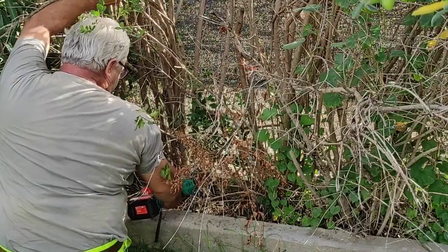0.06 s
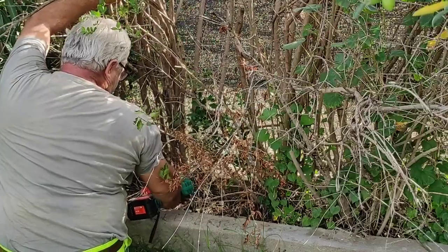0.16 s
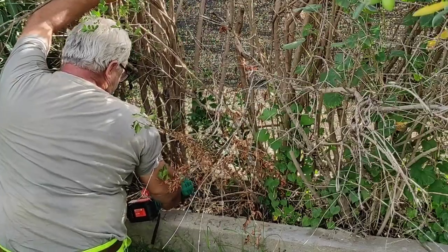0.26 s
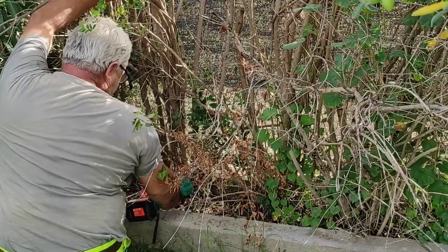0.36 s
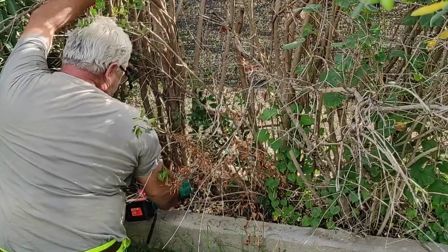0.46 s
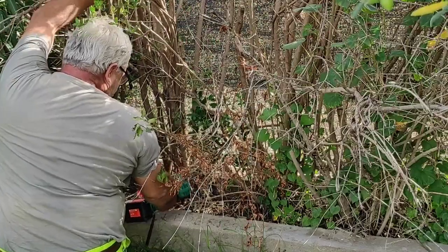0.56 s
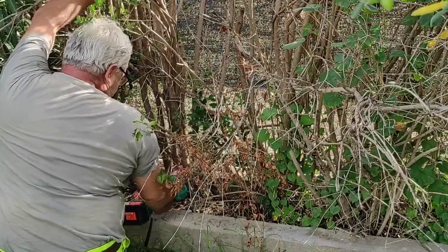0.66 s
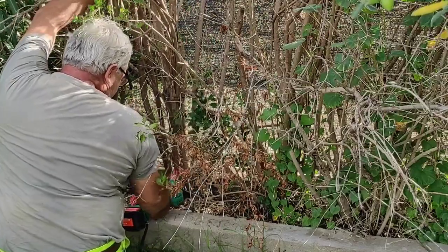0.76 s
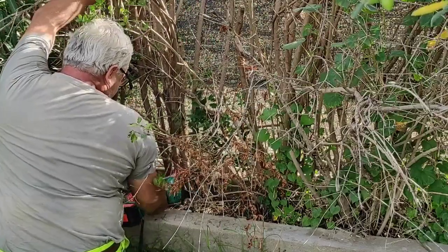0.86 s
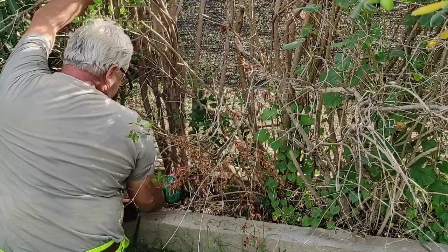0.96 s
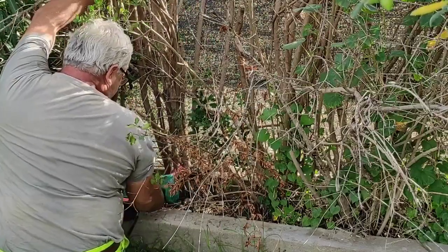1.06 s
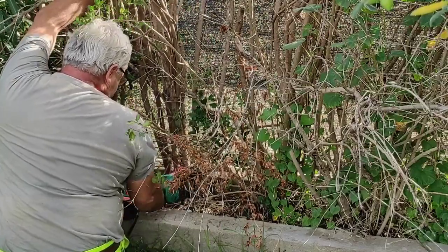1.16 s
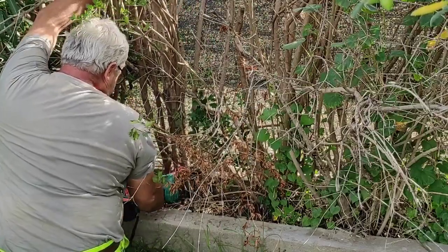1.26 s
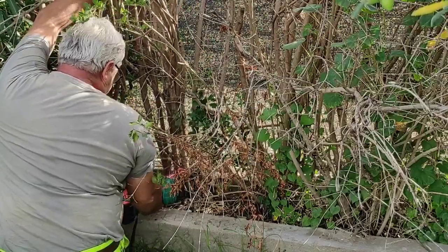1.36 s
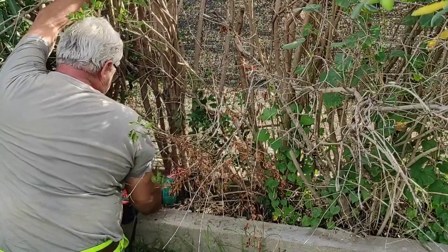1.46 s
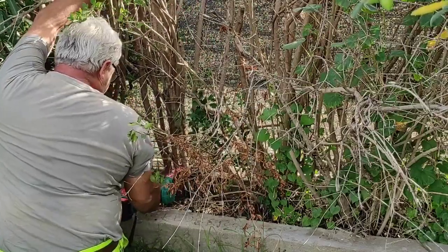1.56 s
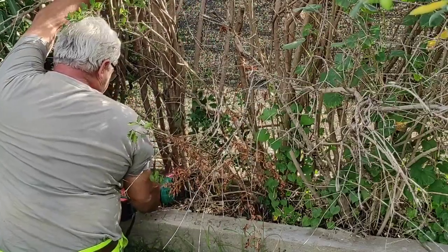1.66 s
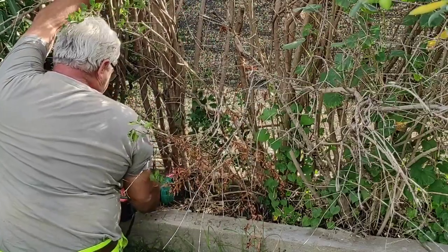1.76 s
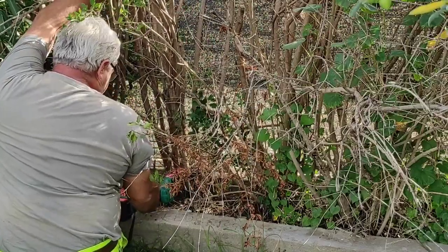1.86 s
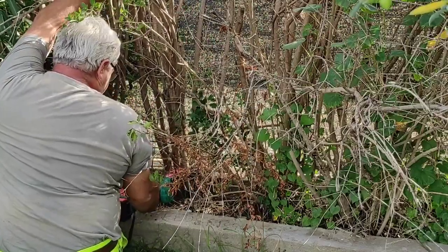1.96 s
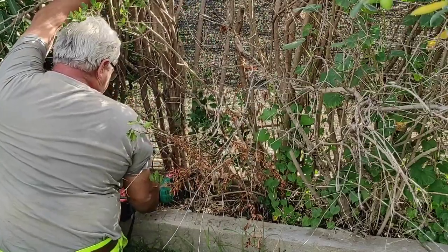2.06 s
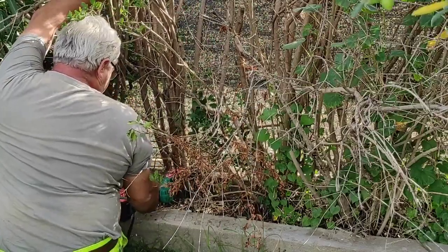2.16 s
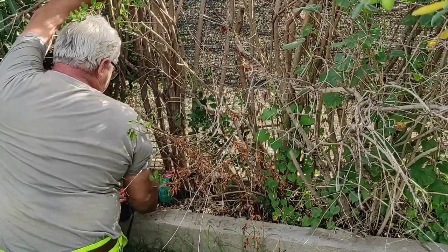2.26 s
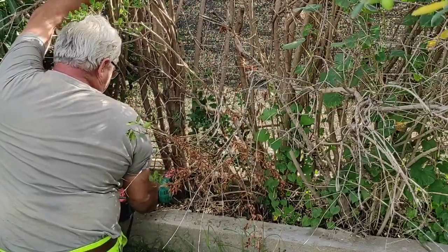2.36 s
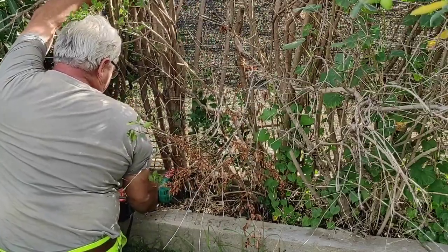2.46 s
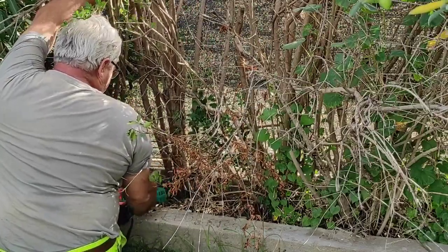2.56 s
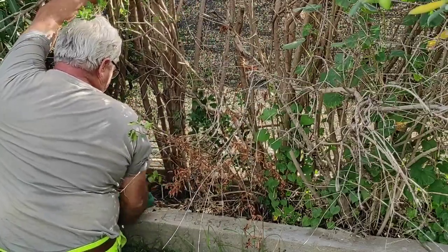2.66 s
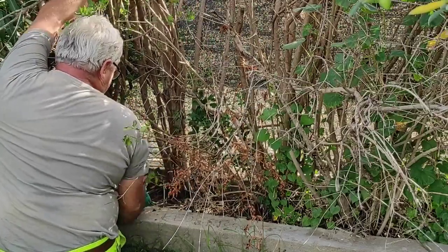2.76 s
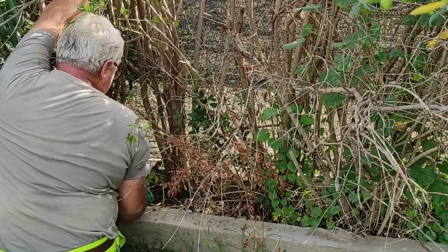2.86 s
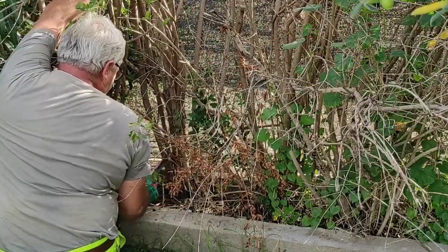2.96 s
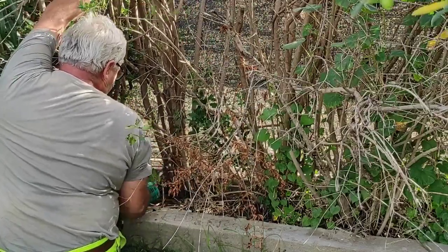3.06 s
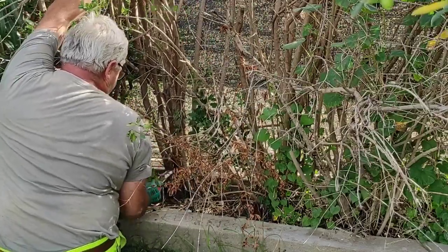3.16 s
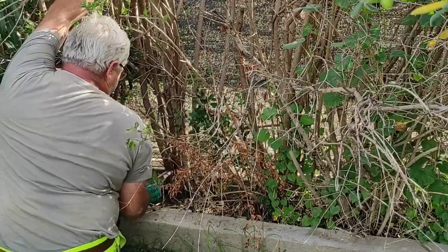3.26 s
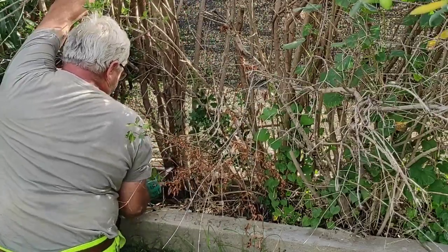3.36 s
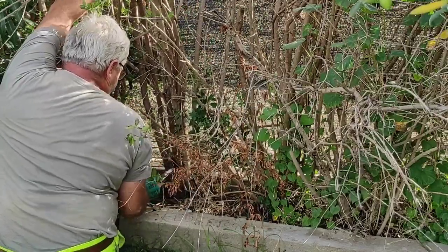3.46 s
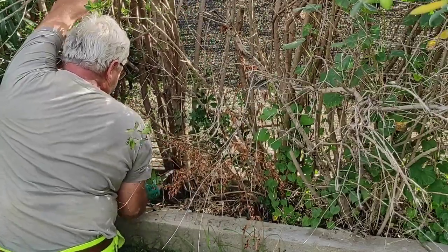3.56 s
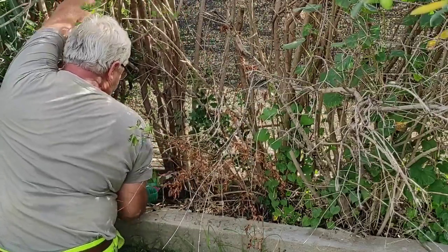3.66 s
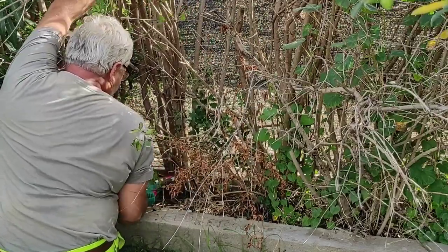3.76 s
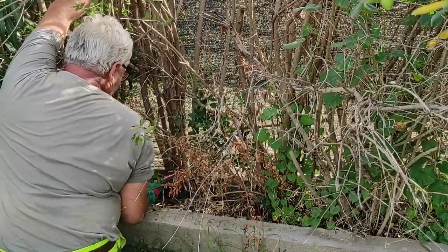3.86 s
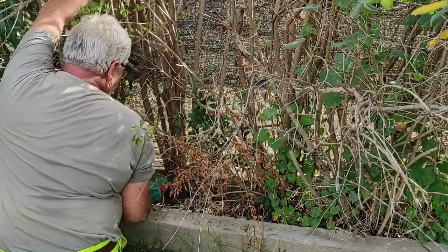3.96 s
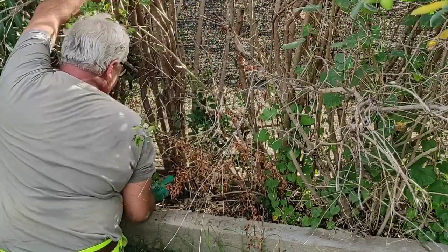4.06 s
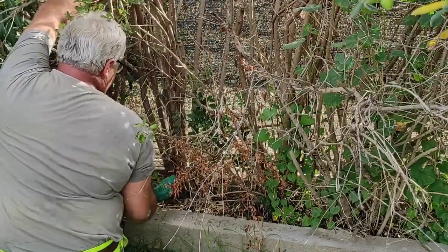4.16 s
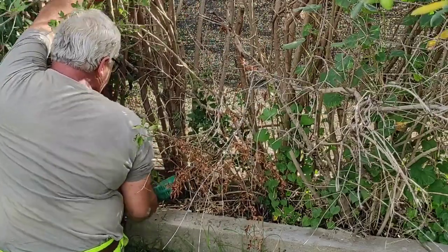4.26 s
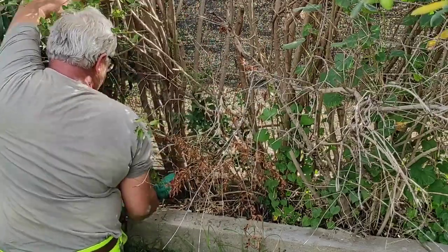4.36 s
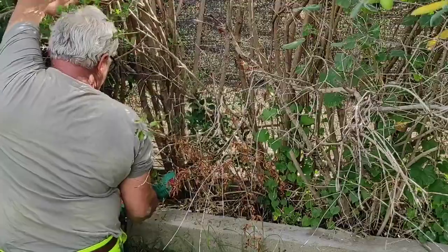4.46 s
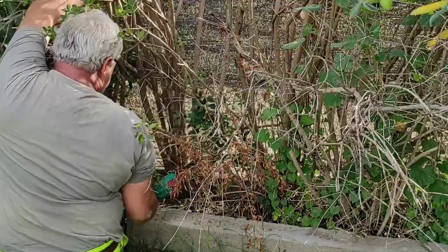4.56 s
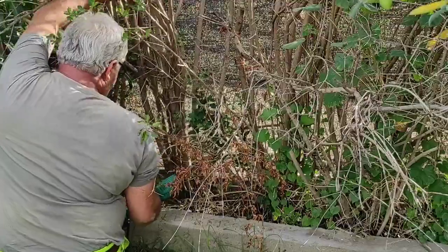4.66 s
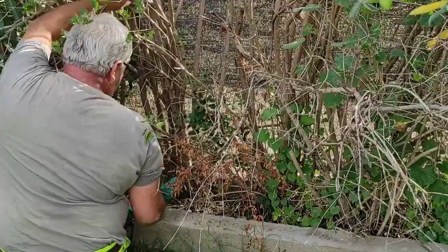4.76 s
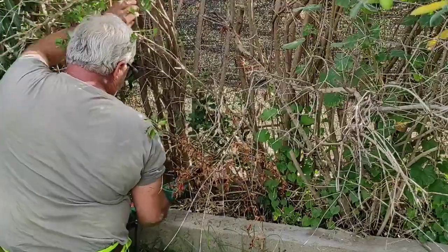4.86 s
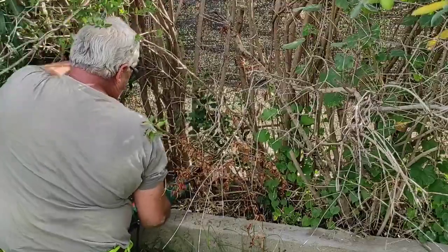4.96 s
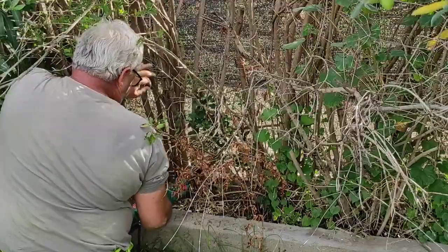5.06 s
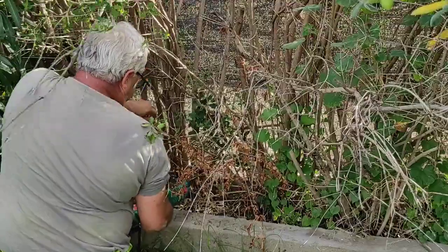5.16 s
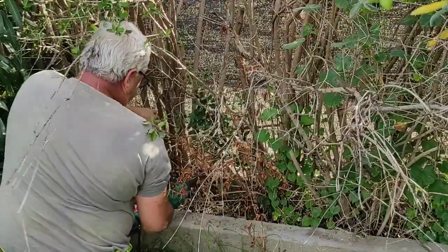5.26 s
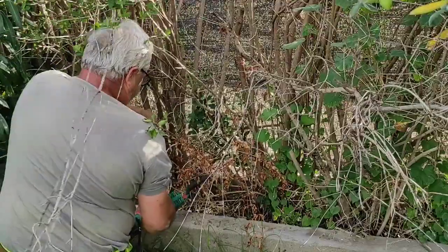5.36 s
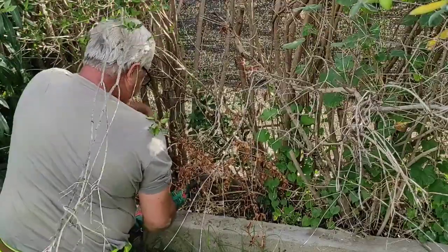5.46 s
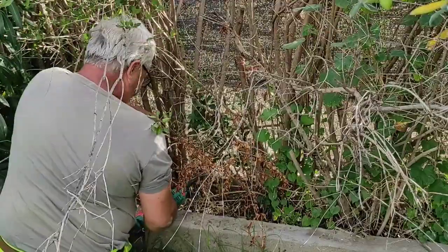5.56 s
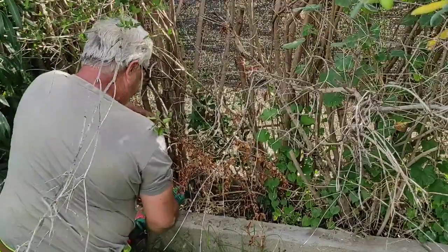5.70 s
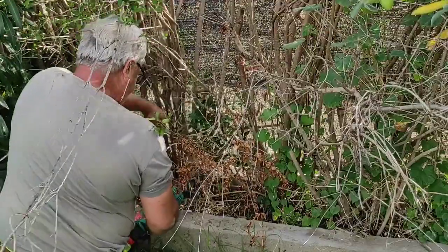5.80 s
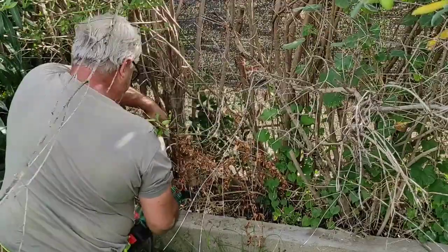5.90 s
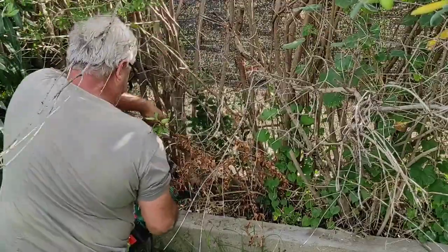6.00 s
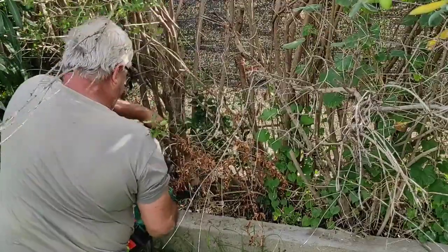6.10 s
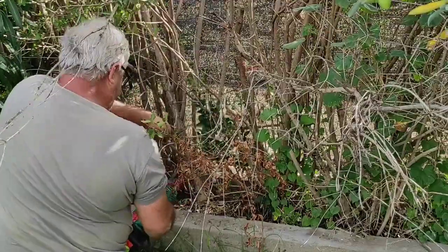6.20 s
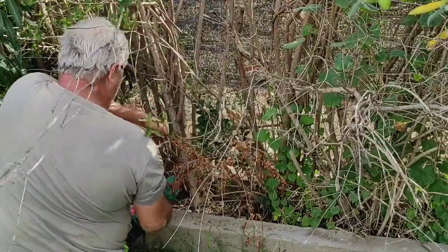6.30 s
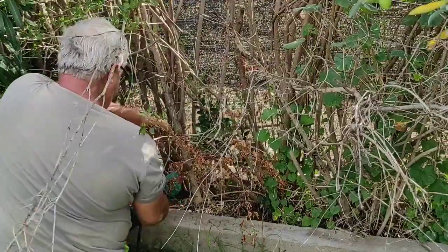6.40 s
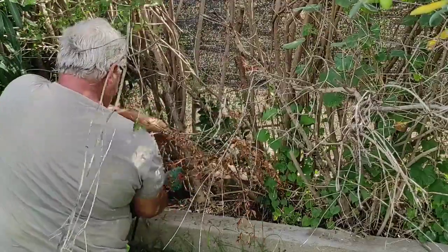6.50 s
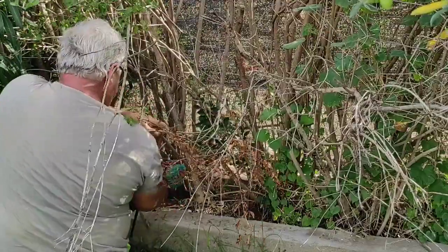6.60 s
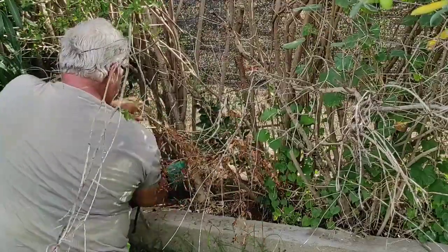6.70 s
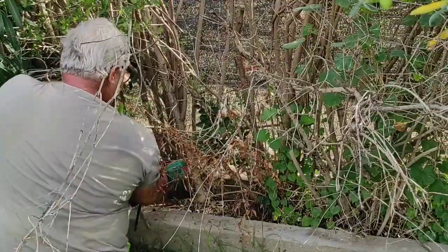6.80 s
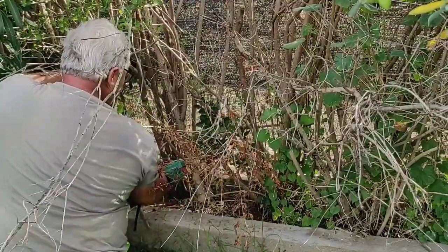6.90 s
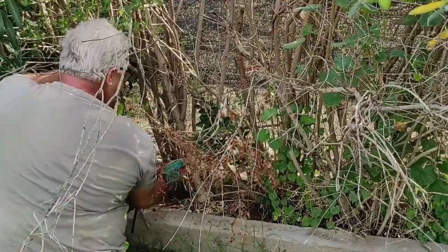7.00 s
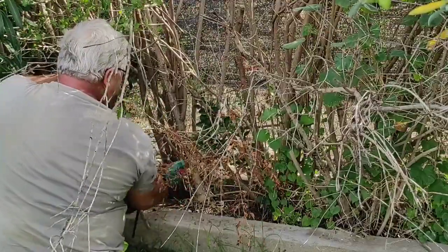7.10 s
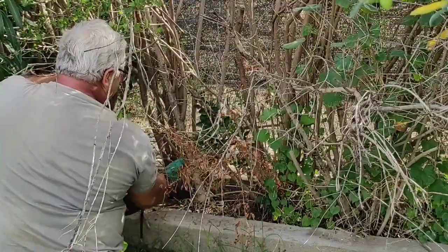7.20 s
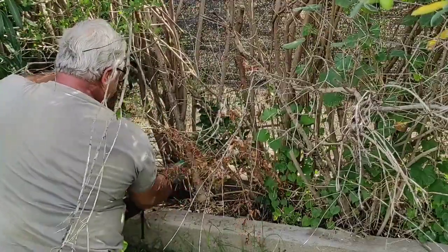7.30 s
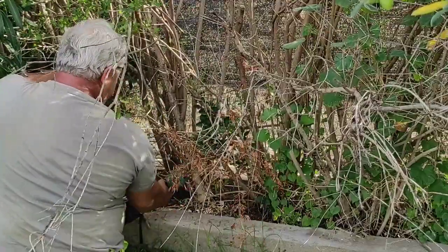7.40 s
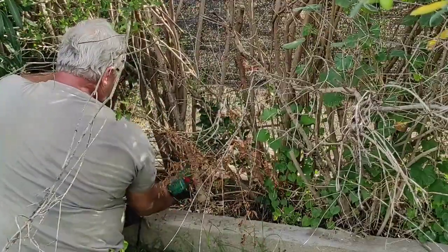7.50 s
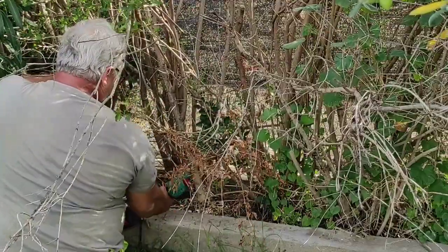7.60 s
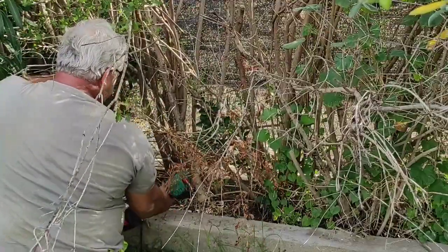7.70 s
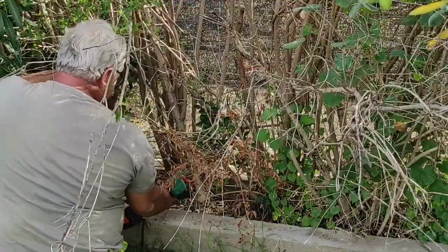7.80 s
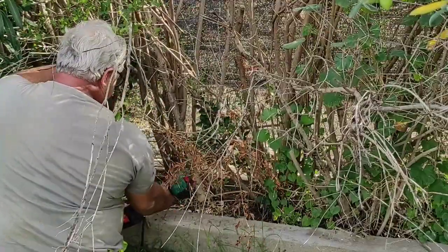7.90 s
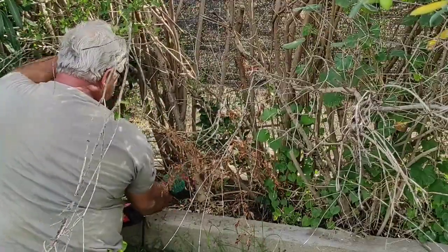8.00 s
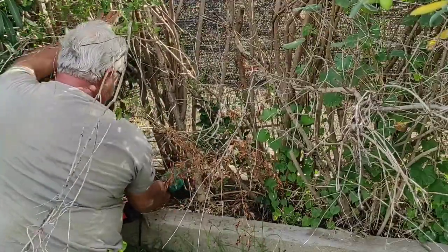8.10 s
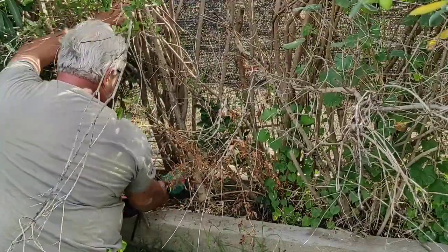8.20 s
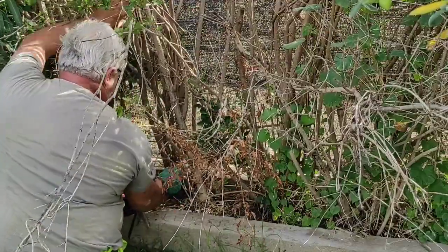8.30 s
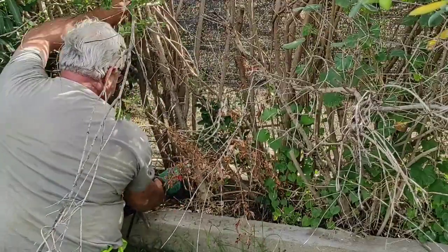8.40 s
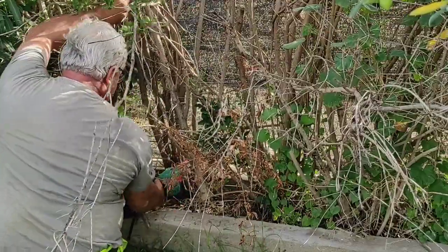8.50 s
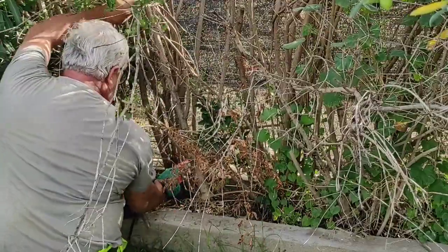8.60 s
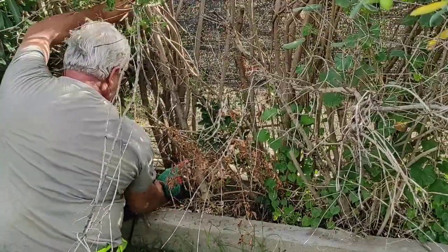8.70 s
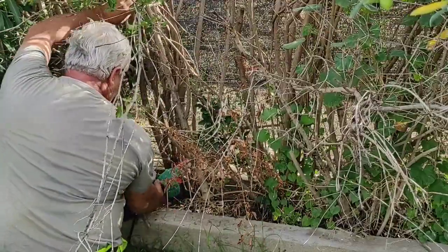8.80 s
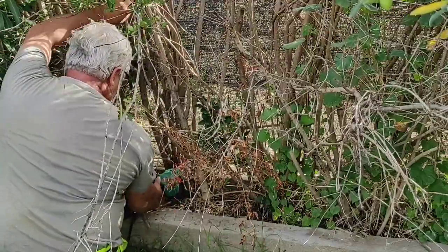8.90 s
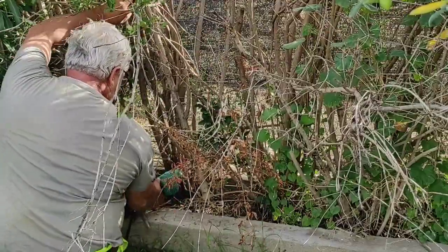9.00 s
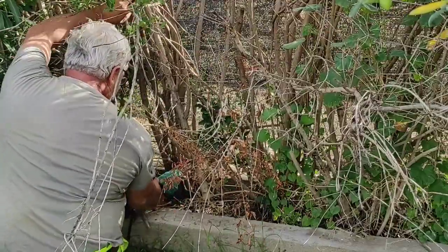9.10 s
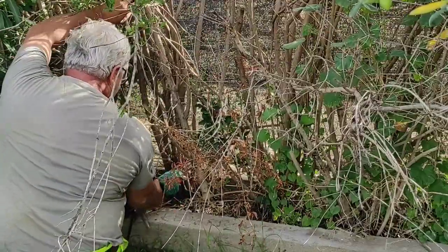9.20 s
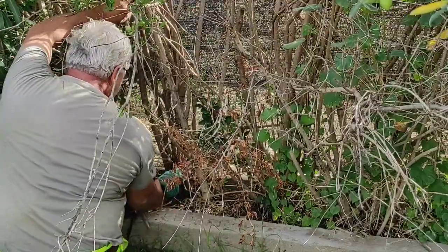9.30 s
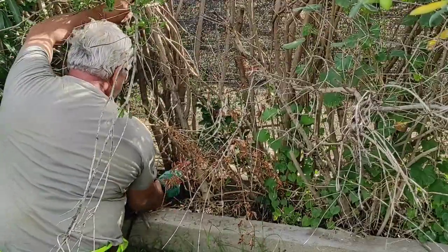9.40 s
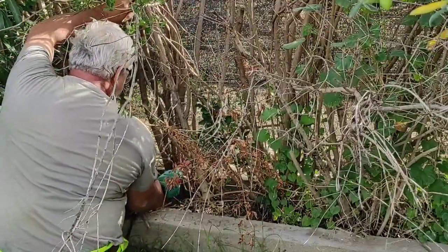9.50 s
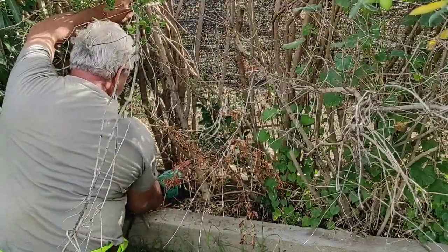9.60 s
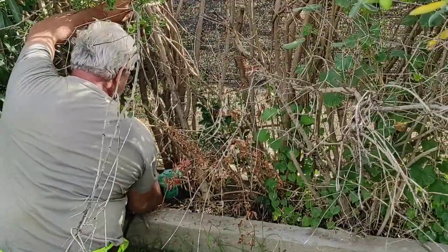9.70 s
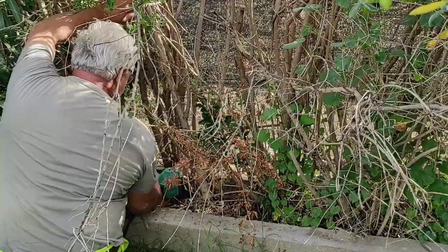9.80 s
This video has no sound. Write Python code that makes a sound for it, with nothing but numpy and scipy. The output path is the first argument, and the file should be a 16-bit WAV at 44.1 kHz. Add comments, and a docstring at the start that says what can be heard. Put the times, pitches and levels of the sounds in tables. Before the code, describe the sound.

In a garden, a small electric chainsaw whines and chews loudly through wood, rising in pitch as it breaks through, then winding down. For the remaining six seconds dry stalks rustle, scrape and crack as they are dragged, with a few soft puffs of breeze over a distant rumble. A click and a brief restart of the saw come last. Everything is close and on the left, with only a dull, faint copy on the right.

```python
"""At a garden fence, close to a phone, a small battery chainsaw chews through dry branches: the chain
rattles, the gears whine and the wood shudders over a distant outdoor rumble. The saw runs free, knocks
against a stem at 3.6 s and coasts to rest. The cut brush is pulled away, rustling, scraping and snapping,
while puffs of breeze reach the microphone. At the very end the trigger clicks and the saw starts again.
The left microphone is close to overload; the covered right one has a dull copy over its own faint noise."""
import sys
import numpy as np
from scipy import signal
from scipy.fft import rfft, irfft
from scipy.io import wavfile

SR = 44100
rng = np.random.default_rng(int(sys.argv[2]) if len(sys.argv) > 2 else 0)


def dump_mix(stems):
    """Bounce the given channels to the path in sys.argv[1] as a 16-bit WAV at rate SR."""
    frames = np.atleast_2d(stems).T  # one column per channel
    limited = np.clip(frames, -1, 1)  # hard clip at full scale
    pcm = np.round(limited * 32767).astype(np.int16)
    wavfile.write(sys.argv[1], SR, pcm)


N = 434369
TIME = np.arange(N) / SR

# Levels are relative, ahead of the gains of each layer and of the mix.
# the motor sags in the wood and races once the branch is through: time_s, shaft_hz
SHAFT_SPEED = [(0, 233), (.26, 230), (.42, 245), (.55, 231), (.76, 231), (.81, 213), (.89, 226),
               (1.02, 257), (1.17, 254), (1.33, 231), (1.53, 225), (1.7, 215), (2.2, 209), (2.57, 214),
               (2.64, 254), (2.77, 279), (2.9, 282), (3.6, 278)]
# the slower the shaft, the harder the chain works: shaft_hz, chain_db, bite_db (relative to the chain)
CHAIN_LOAD = [(214.8, -12, -8), (231.7, -11, -9), (240.1, -12.5, -9), (258.6, -12.5, -16),
              (273, -19.5, -28)]
# colour of the rattling chain: frequency_hz, level_db
CHAIN_COLOUR = [(150, -50), (450, -35), (800, -16.5), (1700, -12.5), (2100, -8), (2450, -7), (3100, -10),
                (3600, -11.5), (4050, -13), (4500, -9), (5400, -7.5), (6400, -2), (7500, -1.5), (8600, -6),
                (10000, -17), (15000, -19.5)]
# resonances of the bar and its housing: pitch_hz, width_hz, level_db
BAR_MODES = [(901, 140, -2.5), (1026, 180, -2.5), (1207, 190, -2), (1308, 137, 2)]
# colour of chips tearing out: frequency_hz, level_db
WOOD_COLOUR = [(40, -15.5), (130, -7.5), (230, -2), (330, -3), (520, -4), (680, 7.5), (1050, 11),
               (1300, 10), (1600, -5), (1820, -1), (2040, 7), (2500, -1.5), (3150, -3.5), (3700, 5),
               (4900, 4.5), (9000, -16)]
# tones of motor, gear and sprocket: shaft_multiple, free_db, cutting_db
WHINE_TONES = [(2.135, -54, -43), (2.455, -52, -48), (3.276, -39, -39), (4.27, -33.5, -38),
               (6.385, -45, -46), (9, -36, -27.5), (15.9, -34.5, -41), (17.93, -43, -43), (23.5, -34, -37),
               (27, -42, -36)]
# the saw is leant on and its gear sings out: start_s, length_s, added_db (relative to the plain whine)
GEAR_LEANS = [(-.02, 0.15, 2.5), (.23, .04, 0), (.46, .03, 0.5), (.56, 0.22, 3), (.8, 0.052, -2.5),
              (1.35, .17, -1.5), (1.67, 0.15, 3), (2.64, 0.093, 3.5)]
# the branch shudders under the cutters: start_s, length_s, level_db, buzz_share_db, pitch_hz
BRANCH_SHUDDERS = [(-.04, 0.29, -29, -2.5, 256), (.455, .04, -32.5, -2.5, 252), (.52, 0.17, -32, 2, 244),
                   (.715, 0.071, -31.5, -7.5, 372), (1.347, 0.089, -29, -12, 376),
                   (2.275, 0.29, -30.5, -12, 320), (2.421, .16, -34, -3.5, 225.8)]
# colour of the steady background: frequency_hz, level_db
BACKGROUND_COLOUR = [(20, -3), (30, -7), (55, -10), (110, -22), (165, -16.5), (240, -19.5), (400, -22),
                     (680, -28), (1100, -31), (2000, -38.5), (4500, -41.5), (7500, -40.5), (10000, -50),
                     (15000, -67)]
# faint steady noise of the blocked right microphone: frequency_hz, below_background_db
RIGHT_NOISE_FLOOR = [(60, 11.5), (110, 17), (200, 11), (380, 18), (700, 13), (1290, 14), (2380, 8.8),
                     (4400, 13.0), (8120, 18.5), (15000, 7.5)]
# the chain skips clear of the wood, most of all as the branch gives way: centre_s, length_s, dip_db
CHAIN_SKIPS = [(0.917, 0.075, -4), (1.035, 0.035, -4.5), (2.611, 0.031, -7.5), (2.665, 0.027, -8)]
# thick stems knock: start_s, level_db, pitch_hz, note_share_db
STEM_KNOCKS = [(2.544, -21.5, 1260, 11), (2.635, -26, 873, 12), (3.601, -35, 345, 0), (3.612, -41, 190, 2),
               (3.734, -45.5, 1293, 16), (4.197, -54, 1310, 10), (4.525, -57, 900, 4), (4.885, -59, 796, 6),
               (5.09, -55, 1930, 7), (5.863, -42, 177, 3.5), (5.932, -36, 985, 5), (5.966, -43, 890, -6),
               (6.26, -52, 1680, 8), (6.336, -49.5, 219, 4), (6.405, -54, 289, 14.5),
               (6.781, -50, 1080, -3), (6.852, -48.5, 950, -11), (7.085, -54.5, 1056, 1),
               (7.34, -55.5, 1030, 5), (7.61, -65.5, 225, 17), (8.189, -44.5, 997, 7.5),
               (8.231, -57, 157, 13), (8.63, -64, 171, 16), (9.385, -57, 750, -7), (9.399, -63, 1150, 10),
               (9.484, -68, 1200, 11), (9.524, -68, 1100, 10)]
# colour of a thick stem: frequency_hz, level_db
STEM_COLOUR = [(50, -16), (170, -1.5), (320, -0.5), (480, -7.5), (950, 4.5), (1500, -4), (3000, -6.5),
               (8000, -37)]
# the modes a knock, snap or click rings with: pitch_multiple, level_db
RING_PARTIALS = [(1, 0), (1.09, -6), (1.43, -8.5), (2.45, -16)]
# twigs snap; last, the trigger clicks twice: start_s, level_db, t60_s, pitch_hz, note_share_db
SNAPS_AND_CLICKS = [(3.4305, -5.5, 0.085, 2490, -14), (3.4504, -11.5, .1, 3330, -12),
                    (3.5357, -14, 0.079, 4440, -10), (3.5988, -2, 0.027, 2780, 0),
                    (3.6012, -12, 0.028, 1540, 6), (3.73, -18.5, 0.064, 2610, -1),
                    (3.801, -23.5, 0.049, 4670, -5), (3.8581, -28, 0.039, 4220, 7),
                    (3.915, -22.5, 0.06, 4820, -12), (4.03, -25, 0.071, 2600, -7),
                    (4.193, -33, 0.041, 4000, -12), (4.3702, -36, .045, 4540, -10),
                    (4.397, -36, .06, 4780, -8), (4.795, -26.5, .06, 4540, -8),
                    (4.8618, -31, .03, 4500, -10), (5.008, -33, .04, 4700, -10),
                    (5.0254, -34, .03, 4400, -10), (5.0855, -36, 0.08, 2770, -8),
                    (5.2285, -26.5, 0.028, 6200, 0), (5.2609, -39, 0.027, 4900, -10),
                    (5.2784, -38, .03, 4500, -7), (5.2969, -30, .04, 2350, -8),
                    (5.3053, -29, 0.1, 2800, -10), (5.449, -27.5, 0.063, 3700, -19),
                    (5.5524, -22.5, 0.054, 4630, -4), (5.5722, -24.5, 0.041, 3280, -7),
                    (5.8915, -0.5, 0.06, 1560, -18), (5.9583, -12, 0.047, 3920, -1.5),
                    (6.7768, -21, 0.043, 2050, -8), (6.8514, -20, 0.035, 2280, -9),
                    (6.8565, -24.5, 0.042, 3700, -7), (7.2033, -38, .06, 4500, -13),
                    (7.2693, -46, .06, 2810, -7), (7.3381, -25.5, .035, 6300, -2),
                    (7.352, -41, 0.036, 4100, -8), (7.655, -37, 0.036, 6500, 3),
                    (7.7213, -39, 0.073, 4870, -13), (7.745, -35, 0.038, 1900, -7),
                    (8.0835, -26.5, 0.064, 6850, -6), (8.188, -26, 0.06, 2540, -16),
                    (8.202, -31, .07, 4330, -12), (8.24, -34, .04, 2640, 4),
                    (8.2871, -22, 0.053, 2230, -13), (8.4842, -25.5, 0.048, 6750, 5),
                    (8.5556, -28, .04, 3200, -7), (8.5626, -27, 0.035, 6500, -7),
                    (8.6444, -38, .025, 3200, -4), (9.0442, -23.5, 0.022, 4700, 3),
                    (9.0793, -37, .05, 4160, -7), (9.1431, -42, 0.057, 4900, -7),
                    (9.24, -42, 0.043, 5030, -5), (9.383, -43, 0.068, 2380, 1), (9.558, -53, .05, 5000, -8),
                    (9.7435, -42, 0.018, 5500, -8), (9.7585, -31, .05, 2500, -6)]
TWIG_SNAPS, TRIGGER_CLICKS = SNAPS_AND_CLICKS[:-2], SNAPS_AND_CLICKS[-2:]
# colour of a sharp snap or click: frequency_hz, level_db
CRACK_COLOUR = [(300, -11), (900, -7), (2000, -6), (4000, -4.5), (6200, 4.5), (7600, 10.5), (9000, 1.5),
                (10500, -7.5), (15000, -12.5)]
# colour of its bright edge, in a twig the finest fibres: frequency_hz, level_db
EDGE_COLOUR = [(2000, -36), (7000, 12), (9500, 5), (13000, -23), (15500, -16)]
# thick stems crush as they bend: start_s, length_s, level_db
STEM_CRUNCHES = [(3.86, 0.1, -47), (5.828, .05, -47), (5.852, 0.023, -47), (8.18, 0.032, -56)]
# pulls and shoves drag the dry brush: start_s, length_s, level_db
BRUSH_PULLS = [(3.9, 0.28, -53), (4.385, 1.1, -48), (4.98, 0.26, -48.5), (5.825, .08, -42.5),
               (5.875, 0.081, -38.5), (6.03, 0.34, -53), (6.17, 0.22, -50), (6.24, 0.12, -44),
               (6.47, 0.093, -52.5), (6.72, 0.068, -49), (7.16, 0.045, -55), (7.32, 0.076, -61.5),
               (7.7, 0.038, -61), (8.06, 0.54, -53), (8.18, 0.13, -48.5), (8.75, 0.25, -60.5)]
# the bundle keeps stirring between pulls: start_s, length_s, level_db
BRUSH_STIRS = [(3.997, 2.954, -56.5), (7.049, 2.7, -66.5)]
# colour of dry leaves and stalks: frequency_hz, level_db
BRUSH_COLOUR = [(300, -17), (550, -6.5), (950, -5), (1500, -8), (2500, -6.5), (3600, -8), (5500, -4.5),
                (7500, 2.5), (9000, -2.5), (10500, -12), (15000, -17)]
# stems scrape over one another: start_s, length_s, level_db, pitch_hz
BARK_SCRAPES = [(4.62, .06, -53, 4200), (5.065, 0.047, -47, 2200), (5.29, .025, -55, 2500),
                (5.985, .015, -42, 2600), (6.205, .05, -52, 2600), (8.89, .03, -62, 1300)]
# puffs of breeze on the open port: start_s, length_s, level_db
BREEZE_PUFFS = [(6.24, 0.2, -47), (7.24, 0.32, -49.5), (8.16, 0.098, -50)]
# what the covered right port takes from close sound: frequency_hz, loss_db
COVER_LOSS = [(60, 13.5), (110, 13.5), (200, 16.5), (380, 20.5), (700, 24.5), (1290, 29), (2380, 31.5),
              (4400, 39.5), (8120, 51), (15000, 41.5)]

TRIGGER_OFF_S, COAST_S, COAST_DB, SLACK_BITE_DB = 3.612, 0.43, -35, -5
RESTART_S, SPIN_UP_S, RESTART_HZ, RESTART_DB = 9.765, 0.016, 240, -30.5
# the freed saw is drawn back behind the body, which shields the motor first, then the chain
WHINE_FADE_S, WHINE_FADE_DB_PER_S = 3.17, 24
CHAIN_FADE_S, CHAIN_FADE_DB_PER_S = 3.286, 25
BAR_DB, BAR_DB_PER_CHAIN_DB, BAR_SHUDDER_DB = -19, 0.62, 2
FULL_BITE_DB = -11.5  # from this bite on, the cutters are fully in the wood
FREE_WOBBLE, CUT_WOBBLE, SHUDDER_WOBBLE = 0.004, 0.014, 0.025  # shares of the pitch
HUM_DB, HUM_HZ, HUM_WIDTH_HZ = -52.5, 288, 88
SHUDDER_ATTACK_S, SHUDDER_RELEASE_S, SHUDDER_SAG_PER_S = 0.036, 0.056, 0.27


def undb(db):
    """Decibels to gain."""
    return np.exp(np.asarray(db) * (np.log(10) / 20))


def unit(x):
    """Scale to rms 1."""
    return x / np.sqrt(np.mean(x ** 2))


def walk(per_s):
    """Smooth random drift that changes per_s times a second, with a spread of 1."""
    fine = signal.resample_poly(rng.standard_normal(8000), 8, 1)
    return np.interp(TIME * per_s, np.arange(len(fine)) / 8, fine)


def response(points, size=2048):
    """Minimum-phase impulse response through (frequency_hz, level_db) points."""
    hz, db = np.transpose(points)
    bins_hz = np.maximum(np.arange(size + 1) * SR / (2 * size), 1)
    gain = undb(np.interp(np.log(bins_hz), np.log(hz), db))
    cepstrum = irfft(np.log(gain))
    cepstrum[1:size] *= 2
    cepstrum[size + 1:] = 0
    return irfft(np.exp(rfft(cepstrum)))[:size]


def colour(x, points):
    """Colour a white excitation, keeping its power."""
    taps = response(points)
    return signal.oaconvolve(x, taps / np.linalg.norm(taps))[:N]


def attenuate(x, loss):
    """Weaken a signal by a (frequency_hz, loss_db) curve."""
    return signal.oaconvolve(x, response([(hz, -db) for hz, db in loss]))[:N]


def resonate(x, hz, width_hz):
    """One resonance, gain 1 at its centre."""
    return signal.lfilter(*signal.iirpeak(hz, hz / width_hz, fs=SR), x)


def resonate_twice(x, hz, width_hz):
    """Two passes through a resonance: steeper skirts, about two thirds of the width."""
    return resonate(resonate(x, hz, width_hz), hz, width_hz)


def swells(rows, attack_s, release_s):
    """Gain of (start_s, length_s, level_db) gestures: each rises, holds and dies away."""
    power = np.zeros(N)
    for start_s, length_s, db in rows:
        rise = np.clip((TIME - start_s) / attack_s, 0, 1)
        fade = np.clip((TIME - start_s - length_s) / release_s, 0, 20)
        power += (undb(db) * rise * np.exp(-fade)) ** 2
    return np.sqrt(power)


def strikes(rate_hz, spread_db):
    """One impact per cycle of a moving rate, each of its own strength."""
    impacts = np.diff(np.floor(np.cumsum(rate_hz) / SR), prepend=0)
    return unit(impacts * undb(spread_db * rng.standard_normal(N)))


def crackle(per_s, spread_db):
    """Tiny clicks at random moments and of uneven size."""
    sizes = undb(spread_db * np.minimum(rng.exponential(size=N), 5))
    return unit((rng.random(N) < per_s / SR) * sizes * rng.choice([-1, 1], N))


def spray(x, t60_s, tail_db):
    """Every impact is followed by its own brief, fading hiss."""
    decay = np.exp(-2 * np.log(1000) / (t60_s * SR))
    power = signal.lfilter([1 - decay], [1, -decay], x ** 2)
    return unit(x + undb(tail_db) * np.sqrt(power) * rng.standard_normal(N))


def glance(x, echo_db, drift_s):
    """Early reflections off ground, low wall and stems, whose paths shift as the hands move."""
    out = x
    for lag_s in (0.0011, 0.0019, 0.0031, 0.0047, 0.0073):
        position = (TIME - lag_s - drift_s * walk(1.3)) * SR
        out = out + undb(echo_db) * np.interp(position, np.arange(N), x)
    return unit(out)


def scatter(x, t60_s, tail_db):
    """Direct sound plus a short diffuse tail from stems, wall and ground."""
    t = TIME[:SR // 4]
    tail = rng.standard_normal(len(t)) * np.exp(-np.log(1000) * t / t60_s)
    reflections = signal.oaconvolve(x, tail / np.linalg.norm(tail))[:N]
    wet = undb(tail_db)
    return (x + wet * reflections) / np.hypot(1, wet)


def drive():
    """Shaft rate, chain gain and depth of bite: under power, coasting to rest, then spinning up again."""
    powered_hz = np.interp(TIME, *np.transpose(SHAFT_SPEED))
    load_hz, *load_db = np.transpose(CHAIN_LOAD)
    chain_db, bite_db = (np.interp(powered_hz, load_hz, db) for db in load_db)
    chain_db -= CHAIN_FADE_DB_PER_S * np.maximum(TIME - CHAIN_FADE_S, 0)
    coasting = np.clip(1 - (TIME - TRIGGER_OFF_S) / COAST_S, 0, 1)
    starting = 1 - np.exp(-np.maximum(TIME - RESTART_S, 0) / SPIN_UP_S)
    first_run = TIME < TRIGGER_OFF_S
    shaft_hz = powered_hz * coasting + RESTART_HZ * starting
    slack_gain = undb(COAST_DB) * coasting + undb(RESTART_DB) * starting
    chain_gain = np.where(first_run, undb(chain_db), slack_gain)
    return shaft_hz, chain_gain, np.where(first_run, bite_db, SLACK_BITE_DB)


def chain_rattle(links):
    """Links strike and slide over sprocket and bar."""
    sliding = crackle(9000, spread_db=1.0)
    contacts = unit(spray(links, t60_s=0.014, tail_db=7.5) + 1.38 * sliding)
    rattle = colour(contacts, CHAIN_COLOUR) * undb(0.65 * walk(50))
    return undb(-0.5) * glance(rattle, echo_db=-13.5, drift_s=0.000303)


def bar_ring(blows, chain_gain):
    """Chain and shuddering branch ring the bar, which fades more slowly than the chain."""
    modes = sum(undb(db) * resonate_twice(spray(blows, t60_s=0.0059, tail_db=2.5), hz, 1.5 * width_hz)
                for hz, width_hz, db in BAR_MODES)
    low_cut = signal.butter(4, 720, "highpass", fs=SR, output="sos")  # a small bar radiates no bass
    shaking = swells([row[:3] for row in BRANCH_SHUDDERS], SHUDDER_ATTACK_S, SHUDDER_RELEASE_S)
    gain = np.hypot(undb(BAR_DB) * chain_gain ** BAR_DB_PER_CHAIN_DB, undb(BAR_SHUDDER_DB) * shaking)
    return gain * undb(1.1 * walk(7.2)) * unit(signal.sosfilt(low_cut, modes))


def wood_chips(shaft_hz, bite_db):
    """Cutters tear chips out of the branch, about one bite to two turns of the shaft."""
    bites = strikes(shaft_hz / 2 * undb(2 * walk(110)), spread_db=4)
    tearing = spray(0.27 * bites + crackle(2500, spread_db=5.0), t60_s=0.074, tail_db=1.5)
    return undb(bite_db + 2.5) * colour(tearing, WOOD_COLOUR)


def whine(shaft_hz, bite_db):
    """Motor and gear tones, clean running free and smeared in the wood, over the housing's rough hum."""
    cutting = np.clip(undb(bite_db - FULL_BITE_DB), 0, 1) ** 2
    wobble = (FREE_WOBBLE + CUT_WOBBLE * cutting) * walk(90)
    phase = 2 * np.pi * np.cumsum(shaft_hz * (1 + wobble)) / SR
    tones = np.zeros(N)
    for multiple, free_db, cutting_db in WHINE_TONES:
        level_db = free_db + (cutting_db - free_db) * cutting + 2.6 * walk(14)
        tones += undb(level_db) * np.sin(multiple * phase)
    flutter = undb(2 * walk(160))  # the chain tugs at the sprocket
    leaning = np.hypot(1, swells(GEAR_LEANS, attack_s=0.023, release_s=0.03))
    hum = undb(HUM_DB) * unit(resonate_twice(rng.standard_normal(N), HUM_HZ, HUM_WIDTH_HZ))
    shielding = undb(-WHINE_FADE_DB_PER_S * np.maximum(TIME - WHINE_FADE_S, 0))
    trigger = np.clip((TRIGGER_OFF_S - TIME) / 0.018, 0, 1)
    return (tones * flutter * leaning + hum) * shielding * trigger


def branch_shudder(blows):
    """The branch buzzes on the bar, sinking in pitch as the kerf deepens; blows rattle its resonance."""
    out = np.zeros(N)
    for start_s, length_s, db, buzz_db, hz in BRANCH_SHUDDERS:
        sag = np.exp(-SHUDDER_SAG_PER_S * np.clip(TIME - start_s, 0, 1))
        phase = 2 * np.pi * np.cumsum(hz * sag * (1 + SHUDDER_WOBBLE * walk(70))) / SR
        buzz = unit(np.sin(phase) + 0.25 * np.sin(2 * phase)) * undb(1.5 * walk(40))
        body = unit(resonate_twice(blows, hz, width_hz=100))
        gain = swells([(start_s, length_s, db)], SHUDDER_ATTACK_S, SHUDDER_RELEASE_S)
        out += (undb(buzz_db) * buzz + undb(-8) * body) * gain
    return out


def grip():
    """Gain of the cutting noise: it drops for an instant whenever the chain skips clear of the wood."""
    return undb(sum(dip_db * np.exp(-(2 * (TIME - centre_s) / length_s) ** 2)
                    for centre_s, length_s, dip_db in CHAIN_SKIPS))


def saw():
    """The chainsaw at close range: one shaft paces the links, the cutters and the gears."""
    shaft_hz, chain_gain, bite_db = drive()
    links = strikes(3 * shaft_hz * undb(2 * walk(600)), spread_db=3.5)
    blows = spray(links + 1.2 * crackle(1500, spread_db=-0.5), t60_s=0.01, tail_db=5)
    jolts = undb(0.79 * walk(45))  # the slack chain slaps unevenly
    cutting = chain_gain * (chain_rattle(links) + jolts * wood_chips(shaft_hz, bite_db))
    ring = jolts * bar_ring(blows, chain_gain)
    return grip() * (cutting + ring) + whine(shaft_hz, bite_db) + branch_shudder(blows)


def background():
    """Low noise with a faint drone that comes and goes: at the open port, the distant outdoor rumble."""
    noise = colour(rng.standard_normal(N), BACKGROUND_COLOUR) * undb(2.0 * walk(5))
    drone = unit(resonate(rng.standard_normal(N), hz=370, width_hz=9.6)) * undb(3 * walk(1.5))
    return undb(-52) * noise + undb(-68) * drone


def right_noise_floor():
    """The faint steady noise of the blocked right microphone, unrelated to the left."""
    return attenuate(background(), RIGHT_NOISE_FLOOR)


def bursts(rows, spectrum, noise, crack_s, tail_db):
    """Each knock, snap or click is a rush of noise, then a fading shiver and its own note."""
    envelope, notes = np.zeros((2, N))
    for start_s, db, t60_s, hz, note_db in rows:
        start = int(start_s * SR)
        t = TIME[:min(SR // 5, N - start)]
        span = slice(start, start + len(t))
        rise = np.minimum(t / 0.0011, 1)
        shiver = rise * undb(tail_db) * np.exp(-np.log(1000) * t / t60_s)
        envelope[span] += undb(db) * (rise * np.exp(-t / crack_s) + shiver)
        phase = 2 * np.pi * hz * t * (1 - 0.25 * t)  # the note sags, as when a stem gives way
        ringing = sum(undb(mode_db) * np.sin(multiple * phase) for multiple, mode_db in RING_PARTIALS)
        notes[span] += undb(db + note_db) * shiver * ringing
    return colour(envelope * noise, spectrum) + notes


def stem_knocks(t60_s=0.064):
    """Thick stems knock low and ring briefly."""
    knocks = [(start_s, db, t60_s, hz, note_db) for start_s, db, hz, note_db in STEM_KNOCKS]
    return undb(-0.5) * bursts(knocks, STEM_COLOUR, rng.standard_normal(N), crack_s=0.0079, tail_db=2.5)


def snaps_and_clicks():
    """Thin twigs crack and splinter brightly; the trigger clicks just before the saw starts again."""
    noise = glance(rng.standard_normal(N), echo_db=-4.5, drift_s=0.000288) * undb(2 * walk(500))
    rows = TWIG_SNAPS + TRIGGER_CLICKS + twig_ticks()
    cracks = bursts(rows + aftercracks(rows), CRACK_COLOUR, noise, crack_s=0.0012, tail_db=-2.0)
    # the bright edge grows more slowly than the crack, so small snaps are the brightest
    fine = [(start_s, 0.65 * db - 26.0, t60_s, hz, -np.inf) for start_s, db, t60_s, hz, _ in rows]
    edges = bursts(fine, EDGE_COLOUR, rng.standard_normal(N), crack_s=0.003, tail_db=-8.0)
    return undb(-9.0) * cracks + edges


def aftercracks(rows, window_s=0.0218):
    """Two weaker, unpitched cracks just after each row: in a twig, the last fibres parting."""
    return [(start_s + window_s * (0.21 + when), db - 17.5 - 9 * weakness, t60_s, hz, -np.inf)
            for start_s, db, t60_s, hz, _ in rows for when, weakness in rng.random((2, 2))]


def stem_crunch():
    """Fibres crush one after another inside a bending stem, dull and woody."""
    grains = spray(crackle(900, spread_db=3.0), t60_s=0.02, tail_db=-1.0)
    return colour(grains, STEM_COLOUR) * swells(STEM_CRUNCHES, attack_s=0.014, release_s=0.035)


def brush_rustle():
    """Dry leaves and stalks scrape past each other in uneven little surges."""
    grains = spray(crackle(900, spread_db=2.5), t60_s=0.03, tail_db=4.0)
    rustle = colour(glance(grains, echo_db=-13.0, drift_s=0.000576), BRUSH_COLOUR)
    movement = swells(BRUSH_PULLS + BRUSH_STIRS, attack_s=0.013, release_s=0.07)
    return rustle * undb(1.96 * walk(30)) * movement


def twig_ticks(per_s=3.3, level_db=-40, t60_s=0.19, lowest_hz=2400, note_db=-6):
    """Snap rows for small twigs that give way at random while the bundle stirs."""
    first_s = BRUSH_STIRS[0][0]
    span_s = BRUSH_STIRS[-1][0] + BRUSH_STIRS[-1][1] - first_s
    return [(first_s + when * span_s, level_db - 10 * weakness, t60_s, lowest_hz * 2 ** octave, note_db)
            for when, weakness, octave in rng.random((int(per_s * span_s), 3))]


def bark_scrapes():
    """Bark sticks and slips on bark, ringing the dragged stem broadly around its own pitch."""
    slips = spray(crackle(700, spread_db=1.5), t60_s=0.015, tail_db=2.0)
    out = np.zeros(N)
    for start_s, length_s, db, hz in BARK_SCRAPES:
        gain = swells([(start_s, length_s, db)], attack_s=0.02, release_s=0.016)
        out += gain * unit(resonate_twice(slips, hz, width_hz=1.3 * hz))
    return out


def breeze():
    """Moving air buffets the open microphone port with a low rumble."""
    rumble = unit(resonate_twice(rng.standard_normal(N), hz=26, width_hz=45))
    return rumble * swells(BREEZE_PUFFS, attack_s=0.054, release_s=0.055)


def scene():
    """The open left port hears it all; the right gets the close work through its cover, less directly."""
    sawing = saw()
    impacts = scatter(stem_knocks() + snaps_and_clicks(), t60_s=0.24, tail_db=-16.5)
    near = sawing + impacts + stem_crunch() + brush_rustle() + bark_scrapes()
    left = near + background() + breeze()
    indirect = scatter(near, t60_s=0.12, tail_db=-1.0)
    right = attenuate(indirect, COVER_LOSS) + right_noise_floor()
    return undb(5.0) * np.array([left, right])


def record(dry):
    """The phone rounds off the loudest peaks and cuts the top."""
    ceiling, knee, top_hz = 1.05, 5, 15600
    rounded = dry / (1 + np.abs(dry / ceiling) ** knee) ** (1 / knee)
    return signal.sosfilt(signal.ellip(10, 0.2, 70, top_hz, fs=SR, output="sos"), rounded)


dry = scene()
out = record(dry)
dump_mix(out)
```